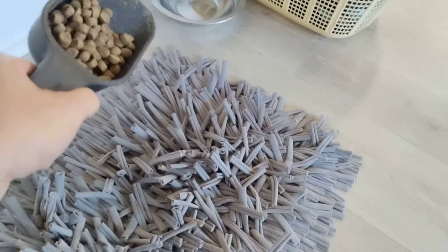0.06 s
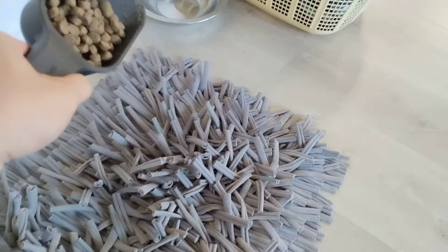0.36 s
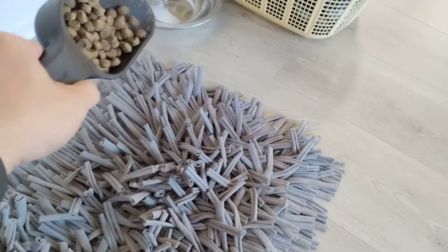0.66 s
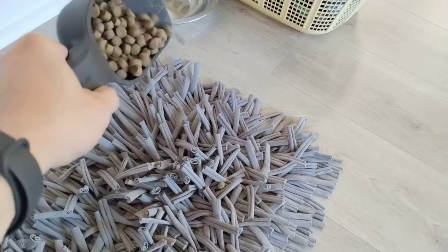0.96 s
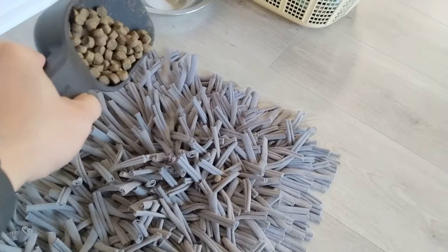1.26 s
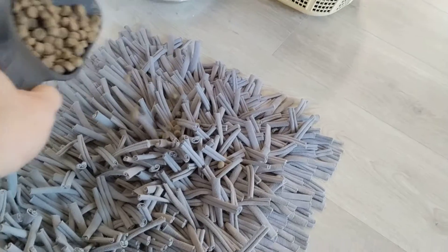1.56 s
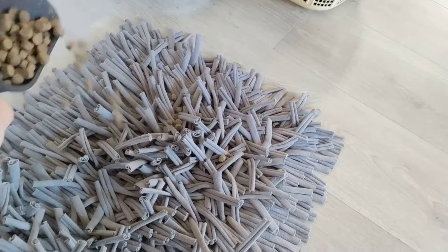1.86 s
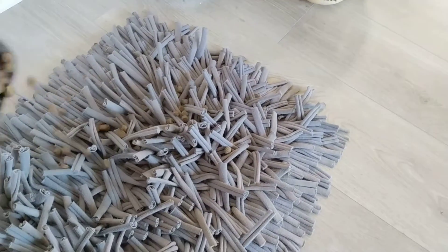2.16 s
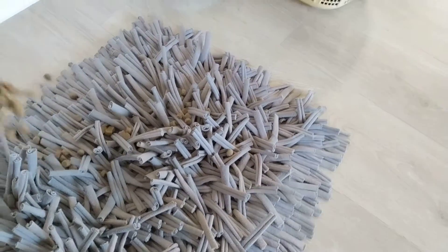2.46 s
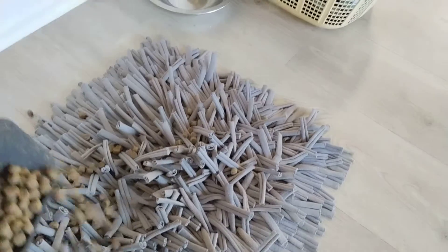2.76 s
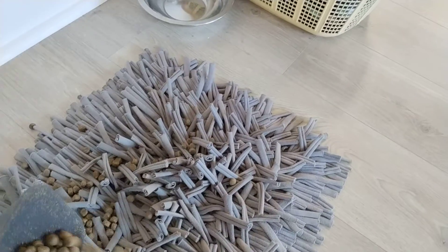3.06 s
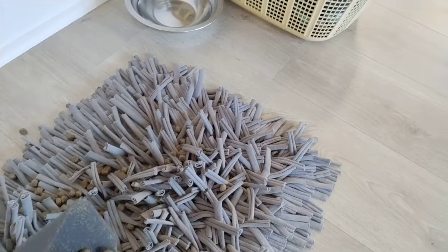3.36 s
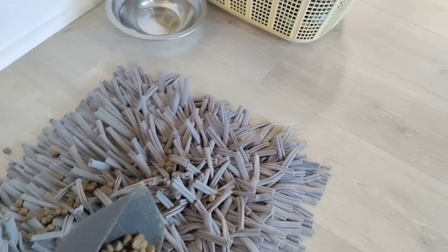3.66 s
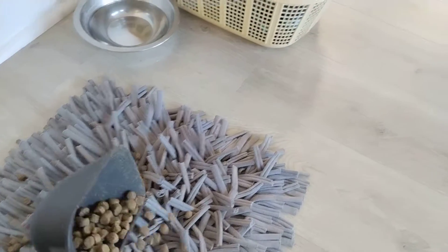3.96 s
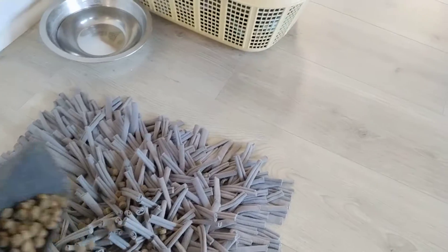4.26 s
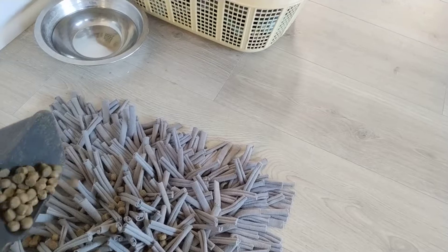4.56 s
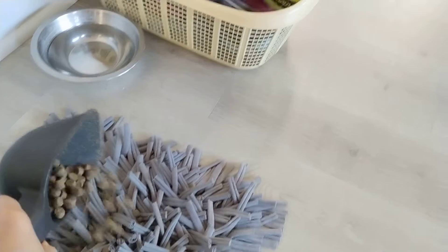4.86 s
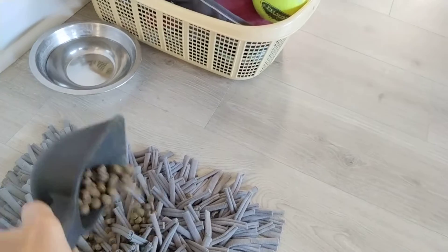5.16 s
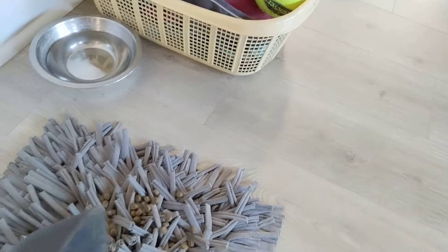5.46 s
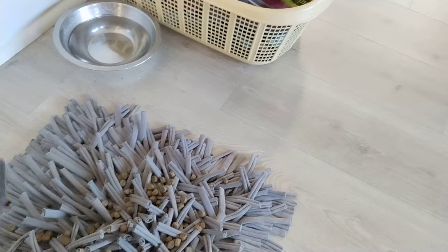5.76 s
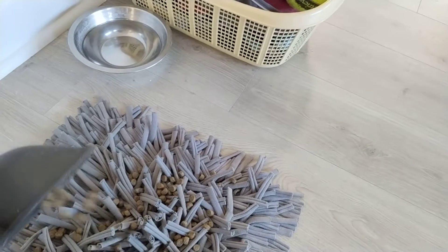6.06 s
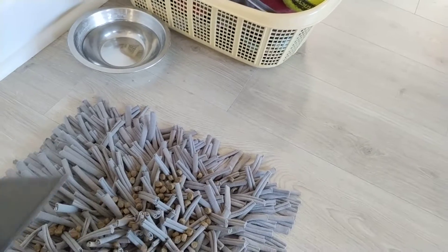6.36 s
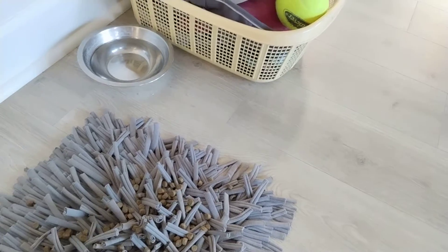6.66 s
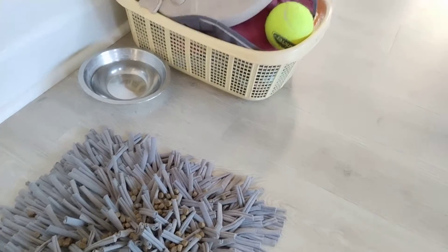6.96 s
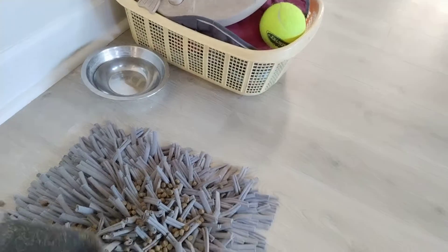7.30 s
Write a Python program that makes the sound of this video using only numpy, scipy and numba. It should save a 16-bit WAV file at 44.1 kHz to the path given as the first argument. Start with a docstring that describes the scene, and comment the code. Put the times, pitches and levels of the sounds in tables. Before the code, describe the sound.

Close up in a quiet room, dry pet food shifts faintly inside a plastic scoop with a few stray taps. Quick, irregular shakes follow, each a plastic rattle with a gritty crunch, mixed with the bright clicks of pellets dropping onto other pellets or the hard floor around a fabric mat. One shake stands out as the loudest, several softer ones come after, and the last pellets land, leaving faint hiss.

```python
"""Dry dog kibble is shaken from a plastic scoop onto a shaggy mat, close by in a hard-floored room.
At first the heap only creeps, and stray pellets knock on the scoop wall. From 0.7 s it slides in short
shakes, rattling the plastic and crunching within itself, while falling pellets click on each other or
the floor. The hardest shake comes at 2.6 s and lighter ones follow. The last pellets land around 6.4 s,
and the creep fades into the room tone."""
import sys
import numpy as np
from scipy import signal
from scipy.fft import rfft, irfft, next_fast_len
from scipy.io import wavfile
from scipy.ndimage import uniform_filter1d
from numba import njit

SR = 44100
rng = np.random.default_rng(int(sys.argv[2]) if len(sys.argv) > 2 else 0)


def dump(signal):
    """Clip the signal to [-1, 1] and save it as 16-bit WAV at the path in sys.argv[1]."""
    limited = np.clip(np.atleast_2d(signal).T, -1, 1)
    pcm = np.round(limited * 32767).astype(np.int16)
    wavfile.write(sys.argv[1], SR, pcm)


N = 327663
TIME = np.arange(N) / SR

# Hard knocks of a pellet on the scoop. Each row: start in seconds, wall level in dB, pellet tick in dB.
KNOCKS = [(0.0118, -47, -81), (0.1103, -42, -58), (0.176, -43, -55), (0.424, -36.5, -56.5),
          (0.629, -31.5, -52), (0.6377, -39, -63), (0.684, -37, -50), (0.7233, -31.5, -52),
          (0.7837, -34, -62), (0.825, -34.5, -59), (1.0357, -41.5, -65), (1.08, -39.5, -55.5),
          (1.09, -29.5, -58.5), (1.1282, -26.5, -46), (1.1504, -26.5, -51), (1.1622, -34.5, -51),
          (1.228, -36, -53.5), (1.6084, -42.5, -58), (1.7374, -42, -68), (1.946, -39, -66),
          (1.9786, -33, -58), (2.1384, -39.5, -61), (2.1854, -45.5, -73), (2.3321, -29.5, -58),
          (2.3404, -30.5, -37.5), (2.6338, -25, -47), (2.649, -21.5, -35.5), (2.6661, -32, -47),
          (2.6882, -31, -48), (2.6964, -27.5, -33.5), (2.8441, -36, -42), (3.0766, -42, -58),
          (3.1639, -31.5, -46), (3.2697, -40.5, -73), (3.4547, -33, -56.5), (3.511, -39.5, -52),
          (3.9285, -32, -54.5), (4.0604, -27.5, -40), (4.095, -37.5, -40.5), (4.207, -39, -51),
          (4.292, -41, -59), (4.8173, -43.5, -69), (4.909, -28.5, -43), (4.961, -34.5, -35),
          (4.9758, -24.5, -42.5), (4.99, -37, -54), (5.0047, -37, -54), (5.144, -33, -51),
          (5.1673, -33.5, -50), (5.2726, -33, -46), (5.2827, -33, -51), (5.6173, -31, -48),
          (6.2327, -30, -46)]
# The heap creeping in the moving scoop between shakes. Each row: time in seconds, rattle level in dB.
CREEP = [(0.0, -61), (1.3, -63.5), (1.8, -73.5), (2.15, -62), (2.5, -63.5), (3.15, -57.5), (3.75, -64),
         (4.55, -73), (4.7, -63), (5.38, -59.5), (5.95, -71), (6.3, -64.5), (6.55, -71.5), (7.43, -99.5)]


def from_db(db):
    return 10 ** (np.asarray(db) / 20)


def at_hz(rows, hz):
    """Each level column of a spectrum, interpolated on a log-frequency axis."""
    points, *columns = np.transpose(rows)
    return [np.interp(np.log(np.maximum(hz, 1)), np.log(points), c) for c in columns]


def low_cut(x, hz, order):
    return signal.sosfilt(signal.butter(order, hz, "high", fs=SR, output="sos"), x)


@njit
def rings(start, height, turn, fade, phase, size):
    """Damped sines that swell within a cycle; start is in samples, turn and fade are per sample."""
    out = np.zeros(size)
    for i in range(len(start)):
        first = int(start[i]) + 1
        z = height[i] * np.exp(1j * (phase[i] + turn[i] * (first - start[i])))
        step = np.exp(1j * turn[i] - fade[i])
        onset_gap, swell = 1.0, np.exp(-turn[i] / np.pi)
        for n in range(max(first, 0), min(first + int(6 / fade[i]), size)):
            onset_gap *= swell
            out[n] += z.imag * (1 - onset_gap)
            z *= step
    return out


def strike(s, db, hz, mode_db, cycles, detune, scatter_db, spread_s):
    """Hits ring modes that fall 60 dB in so many cycles, in stereo; db is energy spread over 5 ms."""
    chance = rng.standard_normal((len(s), 6, np.shape(hz)[-1]))
    pitch, weight, lag, angle, *port_db = chance.swapaxes(0, 1)
    hz = np.minimum(hz * np.exp(detune * pitch), SR / 2)   # each pellet and spot has its own pitches
    share = from_db(mode_db + scatter_db * weight)
    share /= np.linalg.norm(share, axis=1, keepdims=True)
    fade = np.log(1000) * hz / (cycles * SR)
    height = share * from_db(db)[:, None] * np.sqrt(4 * fade * SR * 0.005)
    left_s = s[:, None] + spread_s * np.sqrt(1000 / hz)   # high bending waves run ahead
    right_s = left_s + 0.00029 + 0.00005 * lag   # the right microphone port is farther away
    turn, phase = 2 * np.pi * hz / SR, np.pi * angle
    channels = []
    for arrival_s, uneven_db in zip((left_s, right_s), port_db):   # modes radiate unevenly to the ports
        modes = arrival_s * SR, height * from_db(uneven_db), turn, fade, phase
        channels.append(rings(*map(np.ravel, modes), N))
    return np.array(channels)


def room_tone(level_db=-71, shared_below_hz=500):
    """A quiet bed of still air and microphone hiss, narrower in the bass."""
    # The colour of the bed. Each row: frequency in Hz, relative spectral level in dB.
    spectrum = [(25, -6.5), (50, 3.5), (100, 9), (170, 2), (300, 2), (600, -3), (1200, -9), (2300, -5.5),
                (5000, -9), (9000, -14), (15500, -14)]
    colour = from_db(at_hz(spectrum, np.fft.rfftfreq(N, 1 / SR))[0])
    noise = irfft(rfft(rng.standard_normal((2, N))) * colour, N)
    mid, side = noise / noise.std()
    side = 0.64 * side + 0.23 * low_cut(side, shared_below_hz, order=1)
    return from_db(level_db) * np.array([mid + side, mid - side]) / np.sqrt(2)


def room_reverb(x, near_t60=0.025, near_db=-6.5, tail_db=-6.5):
    """Quick reflections from hand, floor and wall, then the diffuse tail of the room."""
    # Bands of the tail. Each row: centre in Hz, relative spectral level in dB, 60 dB decay in seconds.
    bands = [(150, 4.5, 1), (494, 5, 1), (1120, -4, 0.26), (2200, -2, 0.42), (4500, -3.5, 0.73),
             (8990, -6.5, 0.36), (15000, -10.5, .5)]
    centres, levels, t60s = np.transpose(bands)
    t, hz = TIME[:SR], np.fft.rfftfreq(SR, 1 / SR)
    white = rfft(rng.standard_normal((2, SR)))
    tail = 0
    for band, level_db, t60 in zip(np.eye(len(bands)), levels, t60s):
        noise = irfft(white * at_hz(np.c_[centres, band], hz)[0], SR)
        unit_energy = np.sqrt(2 * np.log(1000) / (t60 * SR))
        tail = tail + noise * from_db(level_db - 60 * t / t60) * unit_energy
    near = rng.standard_normal((2, SR)) * from_db(-60 * t / near_t60) * (t > 0.002)
    near /= np.linalg.norm(near, axis=1, keepdims=True)
    response = from_db(near_db) * near + from_db(tail_db) * tail * (t > 0.008)
    return signal.fftconvolve(x, response, axes=1)[:, :N]


def tumbles(above_creep_db, per_s=12, range_db=14):
    """Times and levels of single pellets toppling in the heap, riding on the creep."""
    jitter, size = rng.random((int(per_s * N / SR), 2)).T
    s = (np.arange(len(jitter)) + jitter) / per_s
    return s, np.interp(s, *np.transpose(CREEP)) + above_creep_db + range_db * (size - 0.5)


def sliding_heap(attack_db_per_s=599.5, rattle_release_db_per_s=182.5, crunch_release_db_per_s=262.5):
    """Rattle and crunch envelopes in dB: at each shake the heap breaks loose, slides and settles."""
    # Shakes of the scoop. Each row: time of reaching full speed in seconds, hold in seconds,
    # rattle on the wall in dB, crunch between pellets in dB.
    shakes = [(0.685, 0.017, -49.5, -65), (0.83, .02, -43.5, -66.5), (0.978, 0.03, -39, -56),
              (1.126, 0.06, -41.5, -62), (1.195, 0.034, -44, -76), (1.301, 0.017, -50.5, -69),
              (1.91, 0.034, -39.5, -53), (2.338, 0.0046, -49, -60.5), (2.59, .04, -35, -49),
              (2.626, 0.045, -31.5, -46), (2.775, 0.016, -40.5, -50), (3.207, 0.017, -46, -54.5),
              (3.268, 0.008, -44, -72), (3.386, 0.021, -48.5, -61), (3.856, 0.073, -40.5, -55.5),
              (4.046, 0.024, -41, -49.5), (4.21, 0.11, -54, -65.5), (4.972, .13, -42, -57),
              (5.145, 0.039, -47, -65), (5.267, 0.024, -39, -50.5), (5.434, 0.065, -41, -57.5),
              (5.579, 0.033, -44, -59), (5.66, 0.024, -49, -71), (6.065, 0.026, -52, -71.5),
              (6.209, 0.0066, -48.5, -60)]
    rattle = np.interp(TIME, *np.transpose(CREEP))
    crunch = rattle - 9.5   # a creeping heap crunches less than it rattles
    for s, hold_s, rattle_db, crunch_db in shakes:
        attack_db = attack_db_per_s * np.maximum(s - TIME, 0)
        after_s = np.maximum(TIME - s - hold_s, 0)
        rattle = np.maximum(rattle, rattle_db - attack_db - rattle_release_db_per_s * after_s)
        crunch = np.maximum(crunch, crunch_db - attack_db - crunch_release_db_per_s * after_s)
    return rattle, crunch


def contacts(envelope_db, per_s, unevenness_db):
    """Times and levels of grains that add up to an envelope: a creep is even, a fast slide is lumpy."""
    jitter, size = rng.random((int(per_s * N / SR), 2)).T
    s = (np.arange(len(jitter)) + jitter) / per_s
    level_db = np.interp(s, TIME, envelope_db)
    lumpy_db = unevenness_db * np.clip((level_db + 77) / 25, 0.3, 1)
    size_db = lumpy_db * np.minimum(-np.log(1 - size), 3.5)
    energy_in_5_ms = uniform_filter1d(from_db(2 * size_db), size=25) * per_s * 0.005
    return s, level_db + size_db - 10 * np.log10(energy_in_5_ms)


def rolled(s, db, roll_s, touches):
    """A rough pellet rolls over its bumps, splitting each hit into touches that share the energy."""
    touch_s = s[:, None] + roll_s * (np.arange(touches) + rng.random((len(s), touches)) - 0.5) / touches
    return touch_s.ravel(), np.repeat(db, touches) - 10 * np.log10(touches)


def landings(bounce_s=0.013, bounce_loss_db=11):
    """Times and levels of falling pellets, each landing and hopping once."""
    # A pellet lands on another or on the floor. Each row: start in seconds, level in dB.
    clicks = [(0.8416, -45), (0.8883, -52), (1.411, -56), (1.5248, -33.5), (1.7527, -50), (2.0786, -47),
              (2.086, -39), (2.179, -51.5), (2.2212, -52.5), (2.7033, -34.5), (2.7693, -36.5),
              (2.787, -42.5), (2.8677, -43.5), (2.9377, -34.5), (3.0243, -48), (3.534, -39),
              (4.1202, -40.5), (4.19, -41), (4.3359, -41.5), (4.3601, -41.5), (4.4027, -42), (4.8384, -44),
              (5.0937, -40), (5.2065, -42), (5.2456, -40), (5.2783, -36), (5.4415, -42), (5.4934, -36.5),
              (5.5411, -33.5), (5.5987, -34), (5.747, -44), (6.3258, -51), (6.3696, -45), (6.3917, -45.5),
              (6.4028, -39.5), (6.4153, -41)]
    s, db = np.transpose(clicks)
    hop_s = bounce_s * (0.5 + rng.random(len(s)))
    return np.r_[s, s + hop_s], np.r_[db, db - bounce_loss_db]


def pellets(crunch_db):
    """Hard pellets click as they land, tick at each knock or tumble and crunch within the heap."""
    # The short, bright ring of a pellet. Each row: frequency in Hz, relative level in dB.
    modes = [(3600, -14), (5200, -8), (6700, -2.5), (7900, -6), (9000, -2.5), (10200, 1), (12000, -6.5),
             (14500, -6.5)]
    knock_s, _, tick_db = np.transpose(KNOCKS)
    hits = np.hstack([landings(), (knock_s, tick_db), tumbles(above_creep_db=-0.5)])
    ticks = rolled(*hits, roll_s=0.0015, touches=4)
    crunch = contacts(crunch_db, per_s=640, unevenness_db=3.5)
    s, db = np.hstack([ticks, crunch])
    return strike(s, db, *np.transpose(modes), cycles=14.1, detune=0.058, scatter_db=6.5, spread_s=0.00015)


def scoop(rattle_db, slide_tilt_db_per_octave=-3.5, knock_thud_db=-5.0, wall_cycles=25, hollow_cycles=24):
    """Knocks and the sliding heap ring the plastic wall; the whole scoop thuds faintly underneath."""
    # The hollow rings higher when the heap covers it, lower as it empties. Each row: time in seconds,
    # hollow pitch in Hz, hollow boost in dB, wall tilt in dB per octave, thud relative to rattle in dB.
    poses = [(0.2, 1140, 5.5, 4.5, -12.5), (0.8, 1470, 1.5, -1.5, -20), (1.2, 1400, 7, 0.5, -18),
             (1.95, 1530, -8, -3, -15.5), (2.58, 1240, -1.5, 4, -19.5), (2.658, 2990, 5.5, 4, -19.5),
             (3.3, 1277, -12, -0.5, -12), (3.9, 1223, -0.5, -2, -16.5), (4.25, 1210, 6, 0.5, -19),
             (4.97, 1088, 1, 0, -24.5), (5.6, 1103, 7, -1, -25), (6.25, 1102, 7.5, 0.5, -24)]
    # Wall modes; the first is the hollow, tuned by the pose. Each row: pitch in Hz, relative level in dB.
    wall_modes = [(1060, -1), (1070, -3.5), (1330, -4.5), (1700, -2), (2100, -2), (2500, -1), (3000, -4.5),
                  (3550, -5), (4200, -4), (4900, -4.5), (6200, -10.5)]
    # Low modes of the whole loaded scoop. Each row: pitch in Hz, relative level in dB.
    body_modes = [(130, -11), (320, -2.5), (420, -1.5), (570, -11), (760, 8)]
    knocks = np.hstack([np.transpose(KNOCKS)[:2], tumbles(above_creep_db=6.5)])
    knock_s, knock_db = rolled(*knocks, roll_s=0.002197, touches=3)
    slide_s, slide_db = contacts(rattle_db, per_s=700, unevenness_db=5.5)
    s, db = np.r_[knock_s, slide_s], np.r_[knock_db, slide_db]
    pose_s, *curves = np.transpose(poses)
    hollow_hz, hollow_db, tilt_db, thud_db = [np.interp(s, pose_s, c) for c in curves]
    tilt_db[len(knock_s):] += slide_tilt_db_per_octave   # sliding contacts are duller than knocks
    thud_db[:len(knock_s)] += knock_thud_db   # one pellet hardly moves the whole scoop
    wall_hz, mode_db = np.transpose(wall_modes)
    is_hollow = np.arange(len(wall_modes)) == 0
    hz = np.where(is_hollow, hollow_hz[:, None], wall_hz)
    mode_db = mode_db + tilt_db[:, None] * np.log2(wall_hz / 2000) + is_hollow * hollow_db[:, None]
    cycles = np.where(is_hollow, hollow_cycles, wall_cycles)
    wall = strike(s, db, hz, mode_db, cycles, detune=0.048, scatter_db=3.0, spread_s=0.0019)
    thud = strike(s, db + thud_db, *np.transpose(body_modes),
                  cycles=13, detune=0.14, scatter_db=1.0, spread_s=0.0015)
    return low_cut(wall, hz=755, order=6) + thud


def scene():
    """Scoop and pellets up front, with the room's reverb and quiet tone behind them."""
    rattle_db, crunch_db = sliding_heap()
    kibble = scoop(rattle_db) + pellets(crunch_db)
    return kibble + room_reverb(kibble) + room_tone()


def record(dry, cutoff_hz=15900):
    """Two microphone ports colour the sound, and a steep low-pass takes off the very top."""
    # Port colour; the left resonates in the treble. Each row: frequency in Hz, left in dB, right in dB.
    ports = [(385, -2, -2.5), (1090, -2.5, 0), (1700, -3, 4.5), (2690, -0.5, 1), (4650, 0, 5),
             (6330, 2.5, -3.5), (7430, 8.5, 3), (7450, 8.5, 2.5), (9130, 17.5, -2), (10460, 8, -3.5),
             (12300, 4.5, -12), (14200, 0.5, -1.5), (15700, 3, -16.5)]
    size = 2 * next_fast_len(N // 2 + SR // 10)
    gain = from_db(at_hz(ports, np.fft.rfftfreq(size, 1 / SR)))
    cepstrum = irfft(np.log(gain))
    fold = np.r_[1, np.full(size // 2 - 1, 2), np.zeros(size // 2)]   # minimum phase: no pre-ringing
    coloured = irfft(rfft(dry, size) * np.exp(rfft(cepstrum * fold)))[:, :N]
    return signal.sosfilt(signal.ellip(10, 0.3, 70, cutoff_hz, fs=SR, output="sos"), coloured)


dry = scene()
out = record(dry)
dump(out)
```